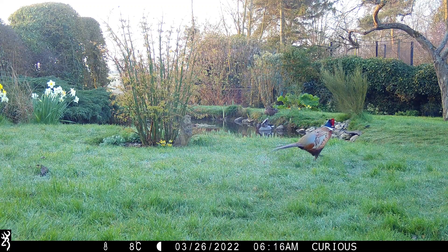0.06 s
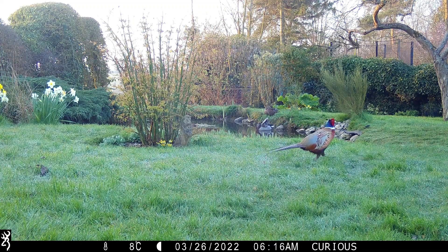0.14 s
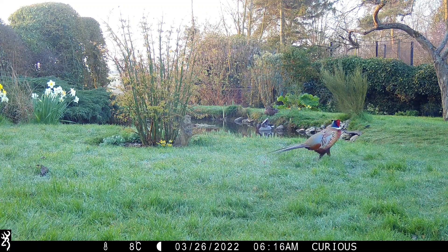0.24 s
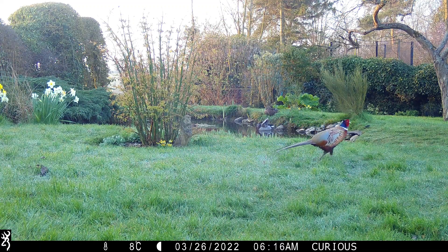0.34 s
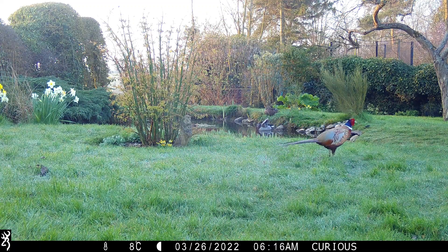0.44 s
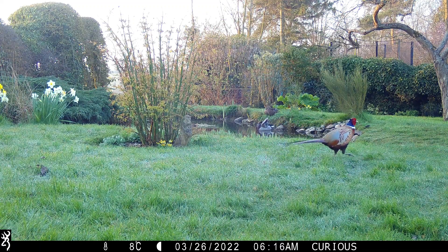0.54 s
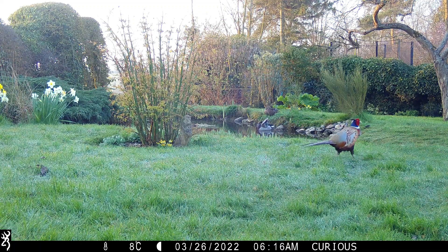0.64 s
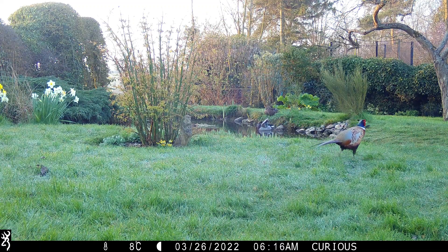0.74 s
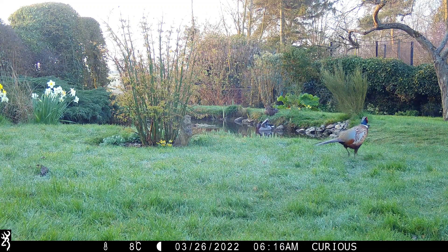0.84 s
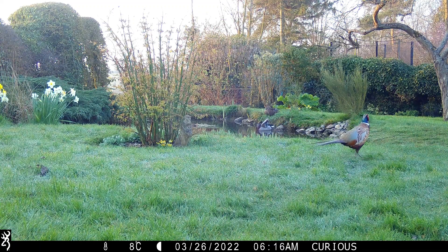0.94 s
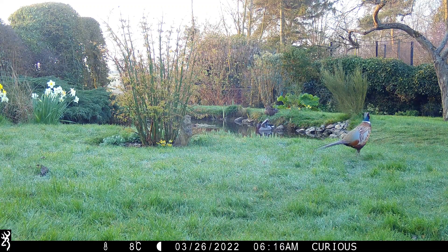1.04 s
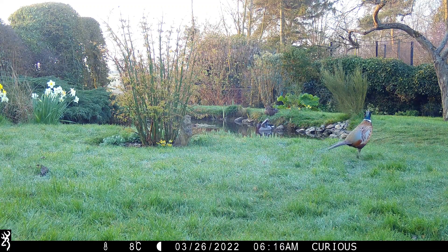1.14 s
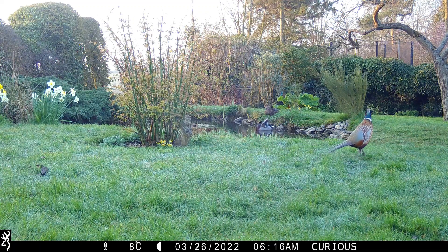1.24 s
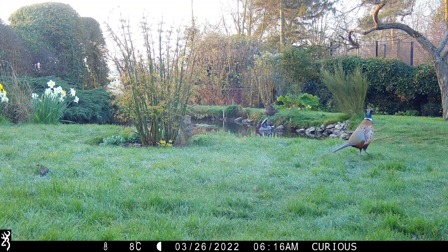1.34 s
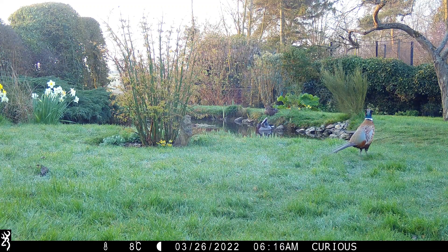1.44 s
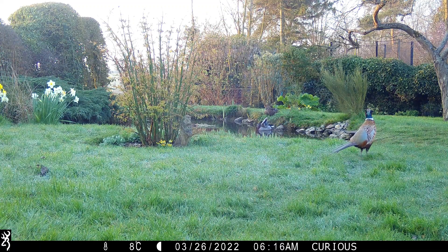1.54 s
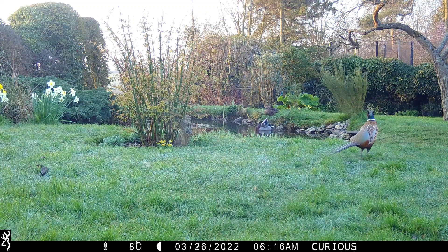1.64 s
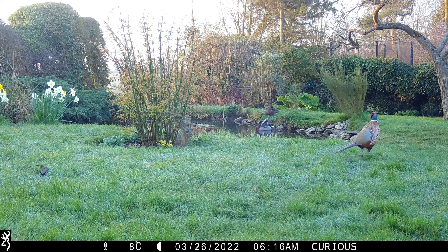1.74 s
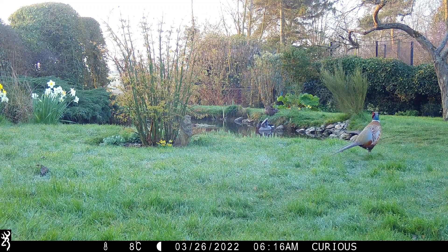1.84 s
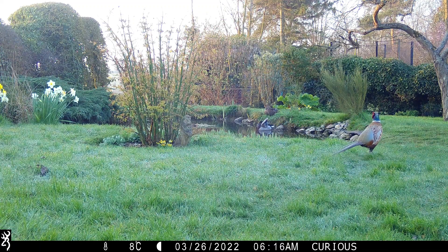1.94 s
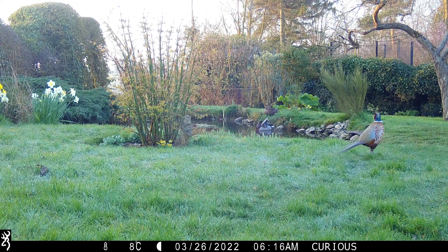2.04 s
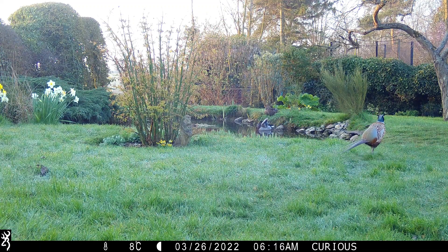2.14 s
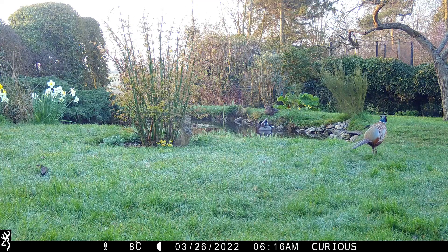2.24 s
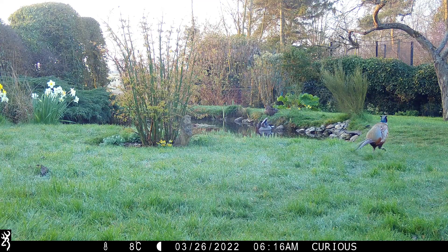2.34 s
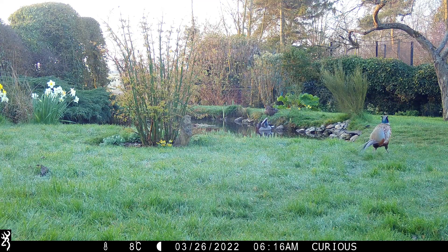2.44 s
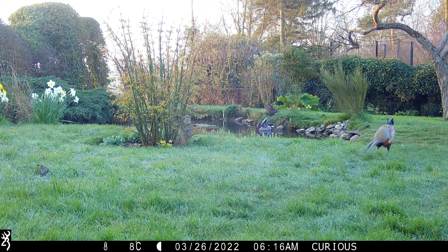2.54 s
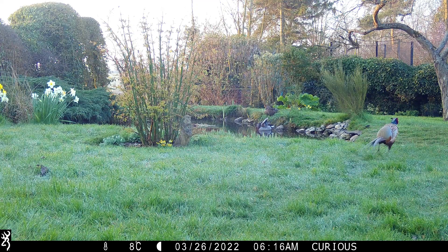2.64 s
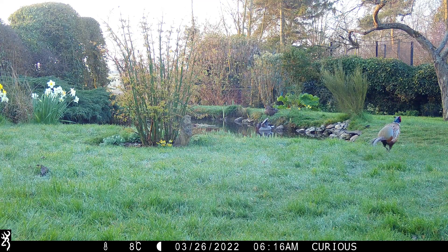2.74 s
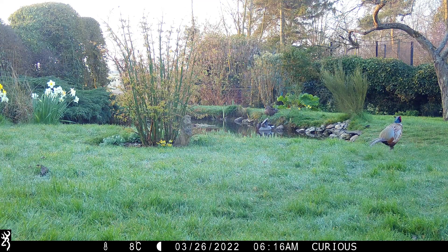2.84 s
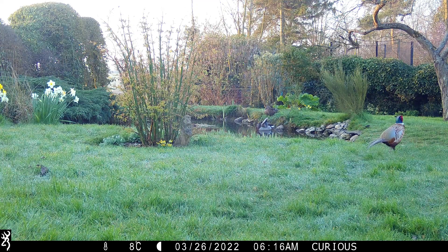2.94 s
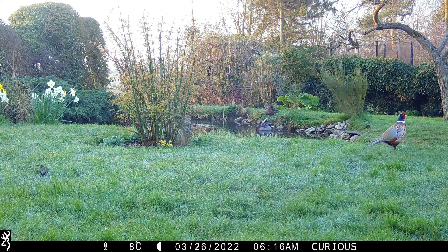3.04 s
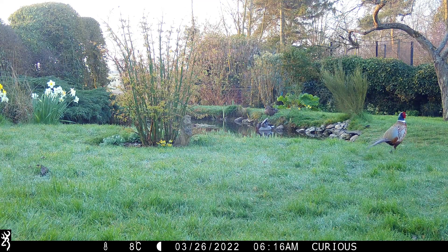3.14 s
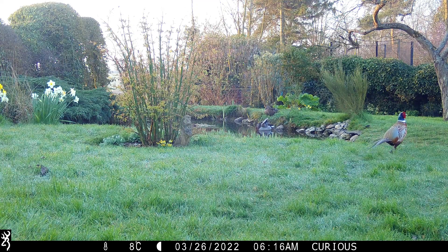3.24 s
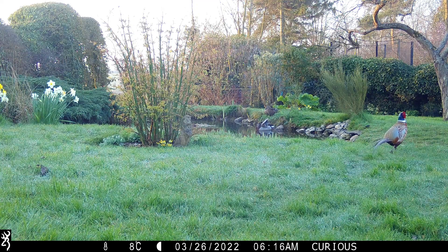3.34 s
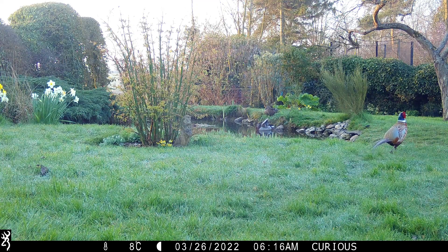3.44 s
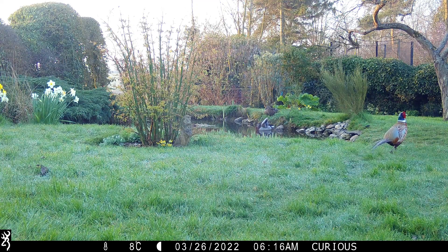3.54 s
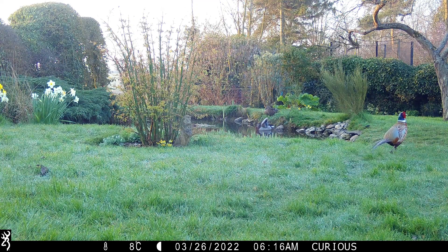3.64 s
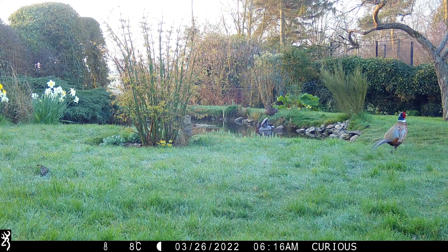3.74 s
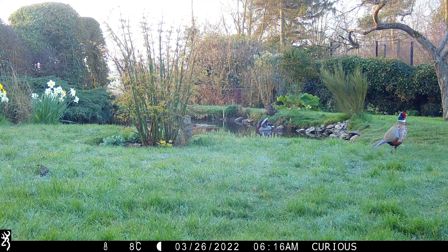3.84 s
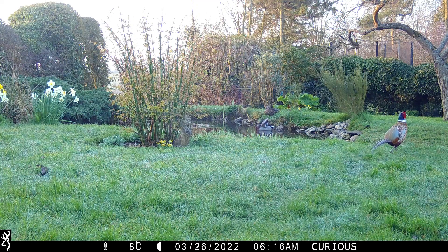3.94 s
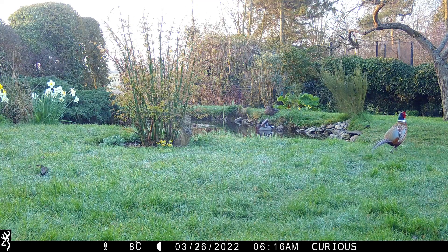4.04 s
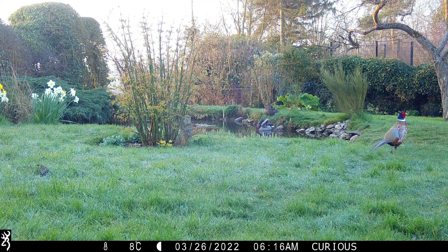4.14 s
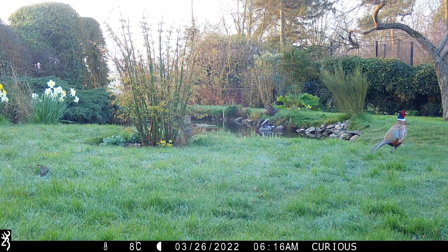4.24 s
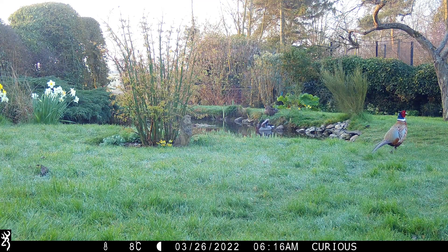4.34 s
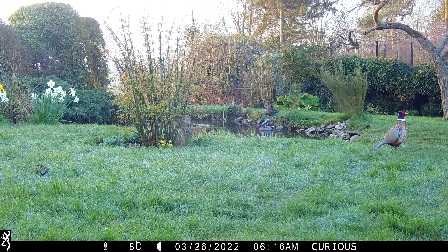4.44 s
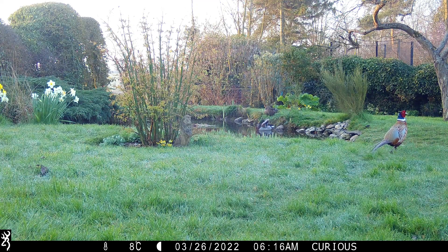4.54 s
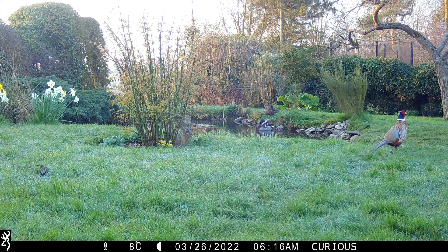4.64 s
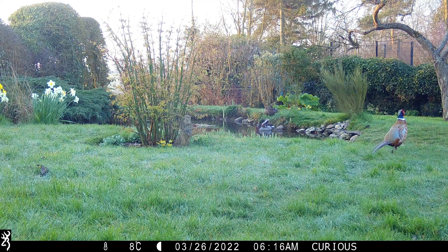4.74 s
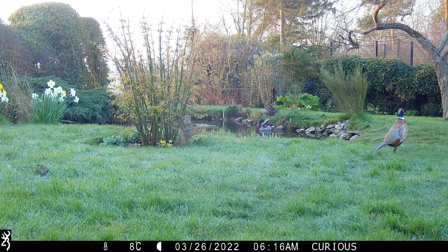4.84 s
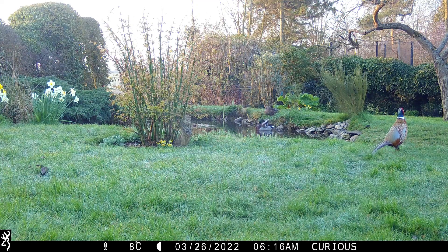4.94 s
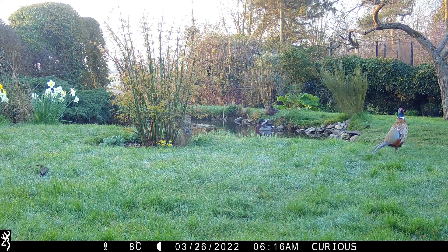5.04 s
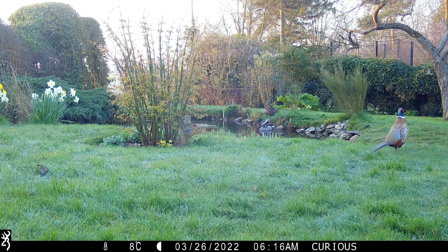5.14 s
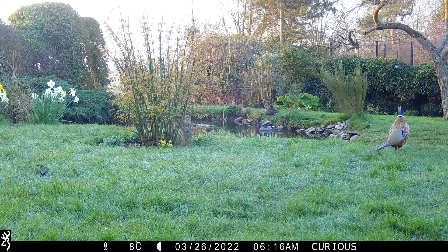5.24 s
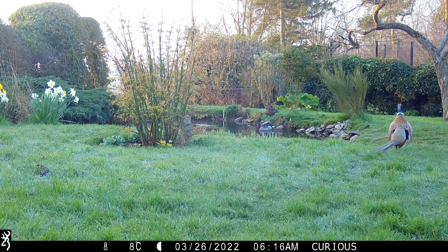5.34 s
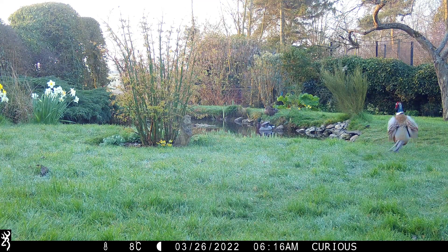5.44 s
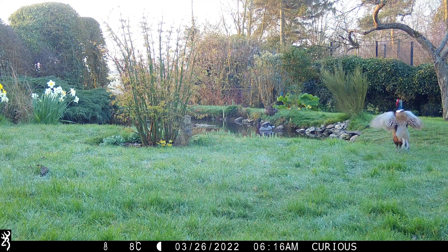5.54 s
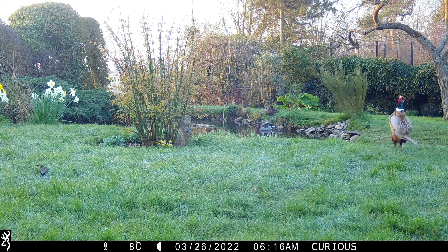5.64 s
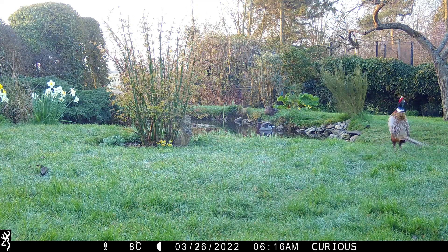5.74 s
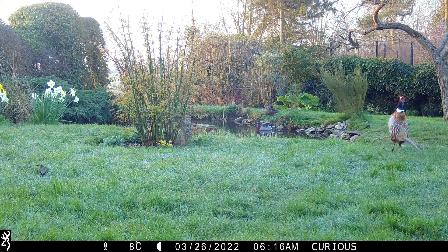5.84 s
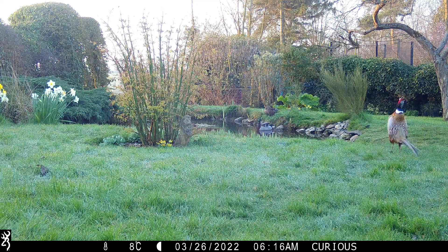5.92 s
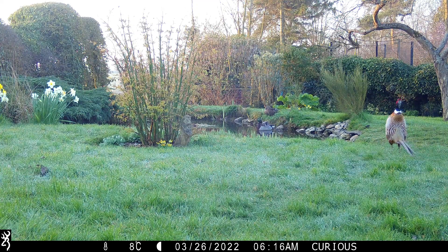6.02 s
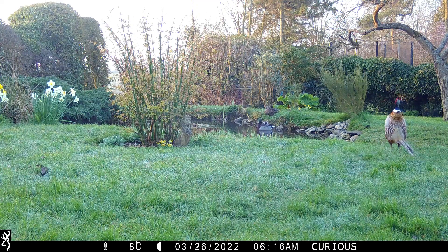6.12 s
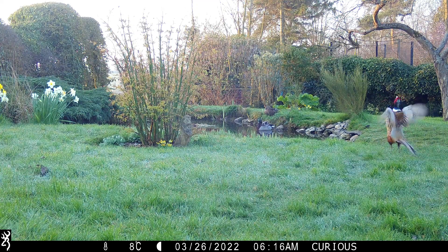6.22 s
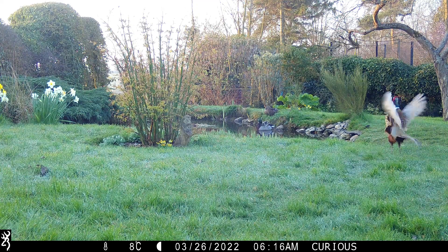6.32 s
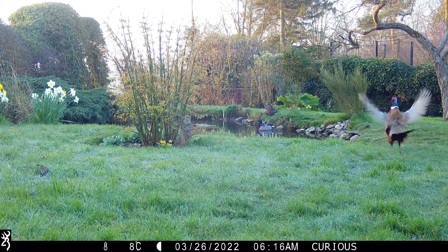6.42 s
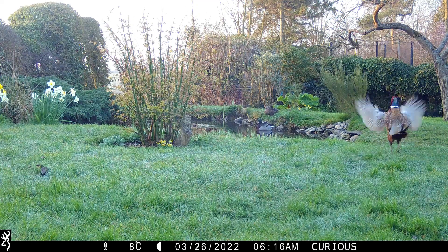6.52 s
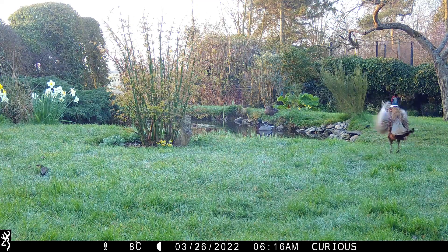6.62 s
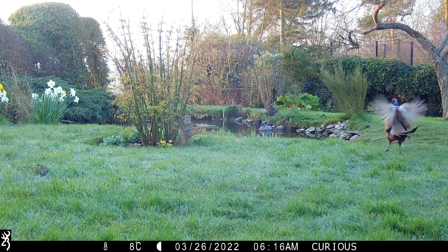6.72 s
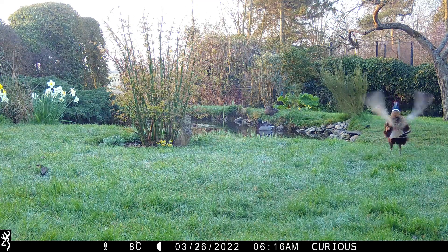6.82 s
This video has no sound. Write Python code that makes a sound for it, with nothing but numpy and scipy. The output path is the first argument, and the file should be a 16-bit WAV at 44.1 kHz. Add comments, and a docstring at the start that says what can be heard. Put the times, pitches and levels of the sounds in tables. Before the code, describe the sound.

Soft garden hush with far birdsong and cooing, sparse bright chirps nearby, and finally two loud, rasping, distorted pheasant crows with feathery wingbeats.

```python
"""Dawn on a garden lawn, heard by a trail camera over a soft distant hush and the camera's own thin chopped whine.
First a far song dies away, stray songbird notes sound and a dove coos far off; then a small bird repeats a
slurred, two-voiced chirp, while a crow, falling whistles, tiny chips and a trill come from far away.
Late on a cock pheasant close by crows twice in rough, strained tones that overload the microphone's input,
then whirrs his wings in puffs of feather noise. Shrubs and trees throw the calls back as echoes and scatter."""
import sys
import numpy as np
from scipy import signal
from scipy.fft import rfft, irfft
from scipy.io import wavfile

SR = 44100
rng = np.random.default_rng(int(sys.argv[2]) if len(sys.argv) > 2 else 0)


def bounce(signal):
    """Save signal as a 16-bit WAV file at the path given by the first command-line argument."""
    frames = np.transpose(np.atleast_2d(signal))
    limited = np.clip(frames, -1, 1)
    pcm = np.round(limited * 32767).astype(np.int16)
    wavfile.write(sys.argv[1], SR, pcm)


N = 303408  # length in samples


def amp(db):
    """Decibels to gain."""
    return 10 ** (np.asarray(db) / 20)


def evened(x):
    """Scales to rms 1."""
    return x / np.sqrt(np.mean(x ** 2) + 1e-20)


def read(points, hz):
    """Reads a table on a log-frequency axis."""
    f, value = np.transpose(points)
    return np.interp(np.log(hz + 1), np.log(f + 1), value)


def add(mix, s, sound):
    """Lays a sound into the mix at time s."""
    part = mix[max(round(s * SR), 0):][:len(sound)]
    part += sound[:len(part)]


def coloured(x, points):
    """Causal (minimum-phase) filter with the gains of a (Hz, dB) table."""
    gain_db = np.maximum(read(points, abs(np.fft.fftfreq(8192, 1 / SR))), -100)
    log_gain = np.log(amp(gain_db))
    # the Hilbert transform of the log gain gives the minimum phase
    taps = np.fft.ifft(np.exp(np.conj(signal.hilbert(log_gain)))).real[:4096]
    return signal.oaconvolve(x, taps)[:len(x)]


def noise(points):
    """Steady noise of a given colour, rms 1."""
    return evened(coloured(rng.standard_normal(N), points))


def waver(count, hz):
    """A random wobble up to about hz, made as one second of rms 1 and repeated if needed."""
    f = np.fft.rfftfreq(SR, 1 / SR)
    spectrum = rfft(rng.standard_normal(SR)) / (1 + (f / hz) ** 2) ** 2
    return np.resize(evened(irfft(spectrum, SR)), count)


def phase_of(hz):
    """Running phase of a pitch curve."""
    return 2 * np.pi * np.cumsum(hz) / SR


def ramps(t, length, attack, release):
    """Smooth attack, hold and release, 0 to 1."""
    return np.sin(np.pi / 2 * np.clip(np.minimum(t / attack, (length - t) / release), 0, 1)) ** 2


def note(length, start_hz, middle_hz, end_hz, db, flutter):
    """A pure note gliding through three pitches, its level fluttering."""
    u = np.linspace(0, 1, int(length * SR))
    hz = np.polyval(np.polyfit([0, .5, 1], [start_hz, middle_hz, end_hz], 2), u)
    tone = np.sin(phase_of(hz * (1 + .006 * waver(len(u), 60))))
    level = signal.windows.tukey(len(u), .18) * (1 + flutter * waver(len(u), 35))
    return amp(db) * evened(tone * level)


# resonances of the close pheasant's throat: centre_hz, width_hz, level_db
THROAT_RESONANCES = [(1033, 126, -9), (1666, 217, -5), (2116, 177, -1.5), (2750, 480, -16),
                     (3150, 81.95, -14.5), (3964, 240, 2.5), (4223, 250, 0), (5080, 346, -4)]


def throat(x):
    """The pheasant's resonances, each applied twice for steep sides."""
    out = np.zeros(len(x))
    for hz, width, db in THROAT_RESONANCES:
        # each pass is wider, so that the pair comes close to the width
        b, a = signal.iirpeak(hz, hz / (1.44 * width), SR)
        out += amp(db) * signal.lfilter(b, a, signal.lfilter(b, a, x))
    return evened(out)


ROUGH_START, ROUGH_END = 0.83, .16  # the voice starts harsh (0-1) and clears
BREAKS = .16  # quick swing of the roughness, rms
CROW_ATTACK_S, CROW_RELEASE_S = 0.021, 0.016
CROW_ARCH_DB = 21  # effort arches this far above the syllable's ends
CROW_LATE = 1.06  # above 1, the effort peaks later than the middle
CROW_PEAK = .48  # pitch peaks at this share of the syllable
CROW_SAG = .27  # and sags to both sides by this times the squared distance from the peak
CROW_WOBBLE = .015  # unsteadiness of the pitch, as an rms share
# colour of the slaps from the open beak: freq_hz, gain_db
SLAP_COLOUR = [(400, -27), (1200, -3), (2000, -1.5), (3200, -2), (4500, 2), (5400, -16.5), (7000, -22)]


def crow(length, top_hz, effort_db, shimmer=0.23, rasp_hz=420, hiss=0.28, slap_db=3.5, crack=0.42):
    """A high, strained tone that keeps breaking into irregular slaps of the syrinx."""
    t = np.arange(0, length, 1 / SR)
    u = t / length
    hz = top_hz * (1 - CROW_SAG * (u - CROW_PEAK) ** 2)
    effort = amp(effort_db + CROW_ARCH_DB * (np.sin(np.pi * u ** CROW_LATE) - 1))
    effort = effort * ramps(t, length, CROW_ATTACK_S, CROW_RELEASE_S)
    # the tone catches and breaks every few ms
    rough = ROUGH_START + (ROUGH_END - ROUGH_START) * u + BREAKS * waver(len(t), 190)
    rough = np.clip(rough, .05, .98)
    phase = phase_of(hz * (1 + CROW_WOBBLE * waver(len(t), 330)))
    tone = sum(np.sin(k * phase) for k in range(1, 6)) * (1 + shimmer * waver(len(t), 640))
    # one slap for each uneven cycle, each of random strength
    cycles = phase_of(rasp_hz * (1 + .3 * waver(len(t), 300))) // (2 * np.pi)
    slaps = np.diff(cycles, prepend=cycles[0]) * amp(slap_db * rng.standard_normal(len(t)))
    rasp = evened(slaps) + hiss * rng.standard_normal(len(t))
    # the sharp edge of each slap passes the open beak directly
    crackle = evened(coloured(slaps, SLAP_COLOUR))
    harsh = 0.8691 * throat(rasp) + crack * crackle
    return effort * (np.sqrt(1 - rough) * throat(tone) + np.sqrt(rough) * harsh)


WHIRR_START_S, STROKE_GAP_S = 6.49, .0265  # first wing stroke, time between strokes
STROKE_S = .0145  # time for a puff to fall to 1/e of its peak
# force of the close whirr, which builds and falters once: time_s, level_db
WHIRR_FORCE = [(6.49, -51.5), (6.62, -44.5), (6.785, -43.5), (6.808, -50.5), (6.835, -45), (6.88, -41)]
# air and feathers: freq_hz, level_db (per Hz)
FEATHER_COLOUR = [(30, -5), (100, -9.5), (370, 3), (700, -14), (1300, 1.5), (2200, 1.5), (3300, -9.5),
                  (4400, -7), (5400, -8), (7400, -26.5), (10000, -8.5), (13000, -49)]
# quills snapping together: start_s, peak_db
QUILL_SNAPS = [(6.632, -24), (6.6477, -46), (6.694, -27), (6.733, -35), (6.7817, -23.5)]
# thin squeaks among the wing beats: start_s, length_s, pitch_hz, level_db
WING_SQUEAKS = [(6.751, 0.0256, 2707, -51), (6.84, 0.016, 2703, -43.5)]


def wings(grain_db=2.5, rise=0.66, uneven_db=1.0, upstroke_db=-1):
    """Quick, even strokes push puffs of air through rustling feathers, with snaps and squeaks among them."""
    t = np.arange(N) / SR
    strokes = np.arange(WHIRR_START_S, t[-1], STROKE_GAP_S)
    levels = np.interp(strokes, *np.transpose(WHIRR_FORCE)) + uneven_db * rng.standard_normal(len(strokes))
    levels = levels + upstroke_db * (np.arange(len(strokes)) % 2)  # every second one is an upstroke
    power = np.zeros(N)
    for s, db in zip(strokes, levels):
        width = np.where(t < s, rise * STROKE_S, STROKE_S)
        power += amp(db) ** 2 * np.exp(-2 * ((t - s) / width) ** 2)
    out = np.sqrt(power) * noise(FEATHER_COLOUR) * amp(grain_db * waver(N, 580))
    click = coloured(signal.unit_impulse(512), FEATHER_COLOUR)
    for s, db in QUILL_SNAPS:
        add(out, s, amp(db) * click / abs(click).max())
    for s, length, hz, db in WING_SQUEAKS:
        add(out, s, note(length, hz, hz, hz, db, flutter=0.085))
    return out


SLUR_SWELL_DB = 5.5  # each part of a chirp gains this much from start to end
SLUR_ATTACK_S, SLUR_RELEASE_S = 0.021, 0.014
DROP_S = 0.01213  # the pitch drops in this last stretch
# rasp in the small bird's voice: freq_hz, gain_db
RASP_COLOUR = [(2200, -14), (3400, -4), (4400, 5), (5400, -2), (6200, 4), (7400, -31.5), (9500, -6.5),
               (11000, -4.5), (13000, -21)]


def slur(length, start_hz, top_hz, climb_s, drop_hz, db, octave_db, beat_hz,
         jitter=0.021, rasp_db=-23, third_db=-17):
    """A climbing, dropping whistle; the syrinx's other side sings higher and beats, with overtones above."""
    t = np.arange(0, length, 1 / SR)
    climb = top_hz - (top_hz - start_hz) * np.exp(-(t / climb_s) ** 2)
    hz = climb - drop_hz * np.maximum(1 - (length - t) / DROP_S, 0)
    phase = phase_of(hz * (1 + jitter * waver(len(t), 620)))
    beat = phase_of(beat_hz * (1 + 0.156 * waver(len(t), 120)))
    voices = np.sin(phase) + .5 * np.sin(phase + beat)
    octave = np.sin(2 * phase) + .5 * np.sin(2 * phase + beat)
    overtones = octave + amp(third_db) * np.sin(3 * phase + 2 * np.sin(beat))
    rasp = evened(coloured(rng.standard_normal(len(t)), RASP_COLOUR))
    level = amp(db + SLUR_SWELL_DB * (t / length - 1)) * ramps(t, length, SLUR_ATTACK_S, SLUR_RELEASE_S)
    return level * (voices + amp(octave_db) * overtones + amp(rasp_db) * rasp)


LEAD_IN, CHIRP_END = .1, .12  # s before and after the accent, ahead of the chirp's factor on length
# the four slurred parts of every chirp, ahead of its factors on pitch and length and its level:
# start_s (from the accent), length_s, start_hz, top_hz, climb_s, drop_hz (pitch factor not applied),
# level_db, octave_db (overtone against the whistle)
CHIRP_SLURS = [(-.062, 0.057, 2910, 3390, .045, 0.5, -25, 15),
               (-.02, .051, 3140, 4893, .0155, 1898, 1, -33),
               (0.03, 0.046, 3000, 4920, .027, -0.5, -11.5, -26),
               (0.066, .049, 3250, 4743, .017, 1553, -4, -36)]


def chirp(level_db, pitch, beat_hz, stretch, lead_db=-29, lead_s=-0.062, lead_length=0.01666):
    """A scratchy start, then the slurred whistles, at this chirp's pitch and pace."""
    t = np.arange(-LEAD_IN, CHIRP_END, 1 / (SR * stretch))
    scratch = evened(coloured(rng.standard_normal(len(t)), RASP_COLOUR))
    out = amp(lead_db) * np.exp(-((t - lead_s) / lead_length) ** 2) * scratch
    for s, length, start_hz, top_hz, climb_s, *rest in CHIRP_SLURS:
        part = slur(length * stretch, start_hz * pitch, top_hz * pitch, climb_s * stretch, *rest, beat_hz)
        add(out, (LEAD_IN + s) * stretch, part)
    return amp(level_db) * out


# when the far dove starts its phrase: start_s
DOVE_STARTS = [.14, 2.82]
# the five-note phrase: start_s (into the phrase), length_s, start_hz, middle_hz, end_hz, level_db
DOVE_COOS = [(0, .52, 497, 520, 570, -63), (.665, .21, 547, 517, 466, -62.5), (1.3, .1, 472, 478, 468, -67),
             (1.61, .2, 472, 468, 470, -71), (2.2, .19, 484, 510, 515, -69)]


def dove():
    """Soft, steady coos, the same phrase twice."""
    out = np.zeros(N)
    for start in DOVE_STARTS:
        for s, *row in DOVE_COOS:
            add(out, start + s, note(*row, flutter=0.04257))
    return out


# a far crow's caws: start_s, length_s, level_db
CROW_CAWS = [(1.647, 0.34944, -62.5), (3.46, 0.24, -64.5), (4.954, 0.34, -58)]
# their hoarse colour: freq_hz, level_db (per Hz)
HOARSE_COLOUR = [(700, -44), (1100, -10.5), (1370, -2), (1650, -13), (2000, -21), (3000, -38.5)]
# a far trill that sinks, its ticks quickening then slowing: time_s, pitch_hz, level_db, ticks_per_s
FAR_TRILL = [(4.72, 4100, -70.5, 32.74), (4.78, 3626, -63, 46), (4.88, 3370, -60.5, 44),
             (5.0, 3384, -66.5, 38), (5.1, 3252, -81, 37)]


def far_birds(tick_hz=500):
    """A trill of swept ticks, and caws of hoarse noise, from beyond the hedge."""
    out, hoarse = np.zeros(N), noise(HOARSE_COLOUR)
    for s, length, db in CROW_CAWS:
        count = int(length * SR)
        add(out, s, amp(db) * signal.windows.tukey(count, .35) * hoarse[int(s * SR):][:count])
    s, *columns = np.transpose(FAR_TRILL)
    t = np.arange(s[0], s[-1], 1 / SR)
    hz, db, rate = (np.interp(t, s, column) for column in columns)
    u = np.cumsum(rate) / SR % 1
    # each tick is a quick sweep from tick_hz above the pitch to tick_hz below
    ticks = np.sin(np.pi * u) ** 4 * np.sin(phase_of(hz + 2 * tick_hz * (.5 - u)))
    add(out, s[0], amp(db) * ticks)
    return out


# a far songbird's long falling whistles: start_s, length_s, level_db
FALLING_WHISTLES = [(1.6, .3, -77), (3.91, .28, -77), (4.26, .33, -71)]
SLIDE_HZ, SLIDE_OCTAVES_PER_S = 5100, 2.5  # their shared start pitch and speed of sinking
CHIPS_START_S, CHIP_GAP_S = 2.70, .142  # an even run of tiny falling chips
CHIP_DB, CHIP_GROWTH_DB = -79, .25  # the first chip's level, and the gain from each to the next
# one chip: length_s, start_hz, middle_hz, end_hz
CHIP_SHAPE = (.045, 5950, 5640, 5180)
# stray songbird notes: start_s, length_s, start_hz, middle_hz, end_hz, level_db
STRAY_NOTES = [(0., .086, 4500, 4560, 3413, -67), (0., .22, 5220, 5100, 5070, -74),
               (0.343, .035, 5900, 5500, 3900, -70), (.38, 0.052, 3630, 3660, 3700, -69.5),
               (5.269, 0.027, 5100, 4600, 4000, -71.5), (5.294, .074, 4350, 4500, 3740, -69.5),
               (5.388, .05, 4470, 4600, 4300, -79)]


def whistles(flutter=.25, count=12):
    """Far songbirds in pure gliding tones: long falling whistles, a run of chips and stray notes."""
    out = np.zeros(N)
    for s, length, db in FALLING_WHISTLES:
        pitches = SLIDE_HZ * 2 ** (-SLIDE_OCTAVES_PER_S * length * np.array([0, .5, 1]))
        add(out, s, note(length, *pitches, db, flutter))
    for k in range(count):
        chip = note(*CHIP_SHAPE, CHIP_DB + k * CHIP_GROWTH_DB, flutter)
        add(out, CHIPS_START_S + k * CHIP_GAP_S, chip)
    for s, *row in STRAY_NOTES:
        add(out, s, note(*row, flutter))
    return out


# a far song dying away among the trees: freq_hz, level_db (per Hz)
DYING_SONG = [(3400, -18), (4100, -5), (4500, 2), (4800, 11), (5150, 5), (5800, -1), (6600, -28)]


def song_end(db=-64, t60=1.2394):
    """The last of a far song, smeared into a fading hiss."""
    return amp(db - 60 * np.arange(N) / SR / t60) * noise(DYING_SONG)


# nearest shrubs and hedge: delay_s, level_db
SHRUB_ECHOES = [(.011, -12), (.027, -21), (.043, -37), (.078, -31)]


def echoes(x):
    """Single reflections from the nearest shrubs and hedge."""
    out = np.zeros(N)
    for delay, db in SHRUB_ECHOES:
        add(out, delay, amp(db) * x)
    return out


# how long the garden's scatter rings: freq_hz, t60_s
GARDEN_DECAY = [(200, 0.24), (1000, 0.72), (2100, 0.56), (4200, 0.53), (6000, 0.39), (12000, 0.64)]


def garden(x):
    """Scatter from leaves and trunks: sparse taps, each band dying at its own speed."""
    sparse = rng.random(SR) < 2500 / SR  # about 2500 taps a second
    onset = np.minimum(np.arange(SR) / (0.012 * SR), 1)
    taps = rng.standard_normal(SR) * sparse * onset
    hz, t, z = signal.stft(taps, SR, nperseg=256)
    decay = amp(-60 * t / read(GARDEN_DECAY, hz)[:, None])
    tail = signal.istft(z * decay, SR, nperseg=256)[1]
    return signal.fftconvolve(x, tail / np.linalg.norm(tail))[:N]


# the small bird's chirps: accent_s, level_db, pitch_factor, voice_gap_hz, length_factor
SMALL_BIRD = [(1.0783, -23.5, 0.96, 345, 0.95), (2.0288, -24.5, 0.93, 397, 0.89),
              (2.974, -25.5, 0.94, 570, 0.93), (3.392, -24.5, 0.94, 553, 1.01),
              (6.205, -22.5, 0.97, 393, 0.9)]
# the close pheasant's two syllables: start_s, length_s, top_pitch_hz, effort_db
PHEASANT = [(5.68, .236, 1082, 6.5), (6.303, .118, 1077, 4)]
FAR_WET, DOVE_WET = .45, .25  # gains of the far calls and the coos into the garden's scatter
# distant hush: freq_hz, level_db (per Hz)
HUSH = [(15, -42), (25, -32), (86, -17.5), (153, -13), (288, -9), (363, -8.5), (491, -5.5), (565, -7),
        (801, -6.5), (1650, -8), (1810, -9), (3390, -17), (5520, -29.5), (6500, -20), (8450, -70),
        (14300, -120)]
HUSH_DB = -60.5


def scene():
    """Near birds, far birds and the hush of the morning, in one channel."""
    small, pheasant = np.zeros(N), np.zeros(N)
    for s, *row in SMALL_BIRD:
        add(small, s - LEAD_IN * row[-1], chirp(*row))
    for s, *row in PHEASANT:
        add(pheasant, s, crow(*row))
    whirr, coos = wings(), dove()
    far = whistles() + far_birds() + song_end()
    near_sends = amp(-14.5) * small + amp(-29) * pheasant + amp(-15.0) * whirr
    scatter = garden(near_sends + FAR_WET * far + DOVE_WET * coos)
    near = small + pheasant + whirr + echoes(amp(2) * small + amp(-4) * pheasant)
    return (near + far + coos + scatter + amp(HUSH_DB) * noise(HUSH))[None]


# the microphone port's resonance: freq_hz, gain_db
PORT = [(20, 1), (2400, 1), (3300, 3.5), (4300, 5.5), (5400, 7.5), (7500, 7.5), (10000, 0.5), (13000, 0)]
# the camera's filter after the input stage: freq_hz, gain_db
CAMERA_FILTER = [(20, 3), (2400, 0), (3300, -4), (4300, -6), (5350, -11.5), (5650, -18), (6100, -22),
                 (7300, -23), (9000, -22.5), (11000, -21), (13600, -20), (15500, -24)]
EDGE_HZ = 15850  # steep upper limit of the camera's sound


def record(dry, ceiling_db=-7, hiss_db=-87, whine_db=-81.0, block_hz=12):
    """The microphone rings and overloads its input; the camera dulls the treble, adds hiss and a chopped whine."""
    t = np.arange(N) / SR
    fine = signal.resample_poly(coloured(dry[0], PORT), 2, 1)  # double rate keeps the overload free of aliases
    overloaded = signal.resample_poly(amp(ceiling_db) * np.tanh(fine / amp(ceiling_db)), 1, 2)
    coupled = signal.lfilter(*signal.butter(1, block_hz, "high", fs=SR), overloaded)
    whine = np.sin(2 * np.pi * 7797 * t) * np.tanh(12 * np.sin(2 * np.pi * 29.65 * t))
    hiss = amp(hiss_db) * rng.standard_normal(N)
    out = coloured(coupled, CAMERA_FILTER) + hiss + amp(whine_db) * evened(whine)
    edge = signal.firwin(1023, EDGE_HZ, window=("kaiser", 9), fs=SR)
    return signal.oaconvolve(out, edge, "same")[None]


dry = scene()
out = record(dry)
bounce(out)
```